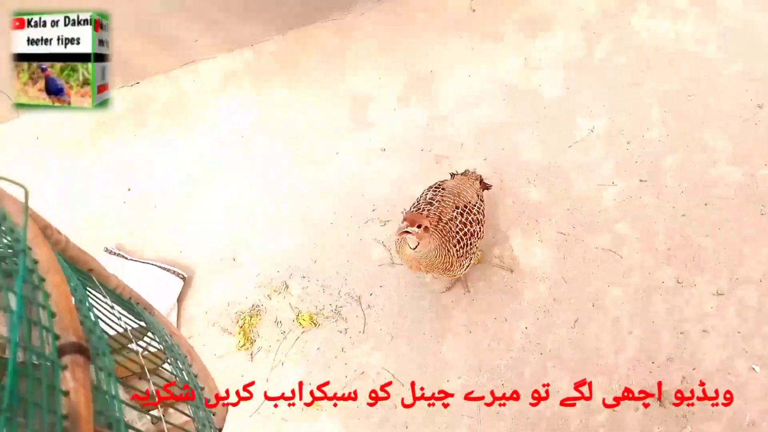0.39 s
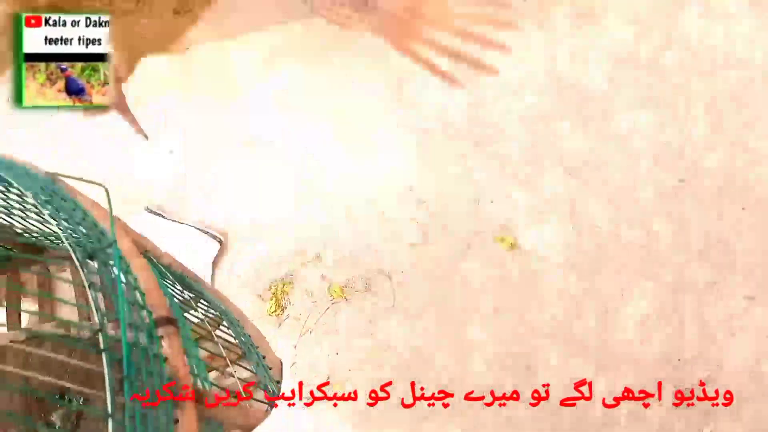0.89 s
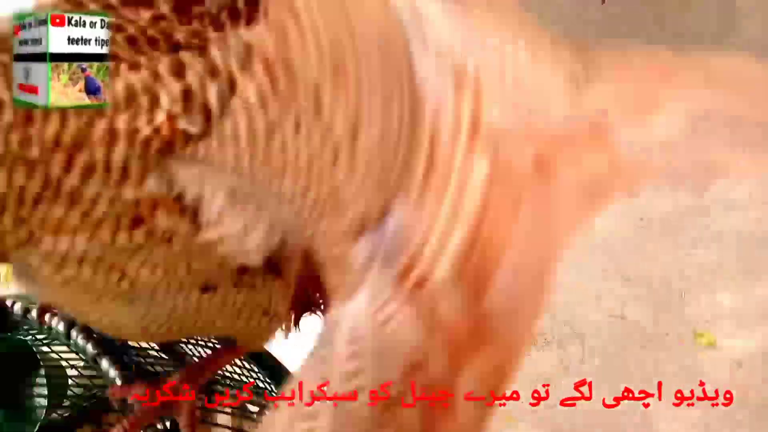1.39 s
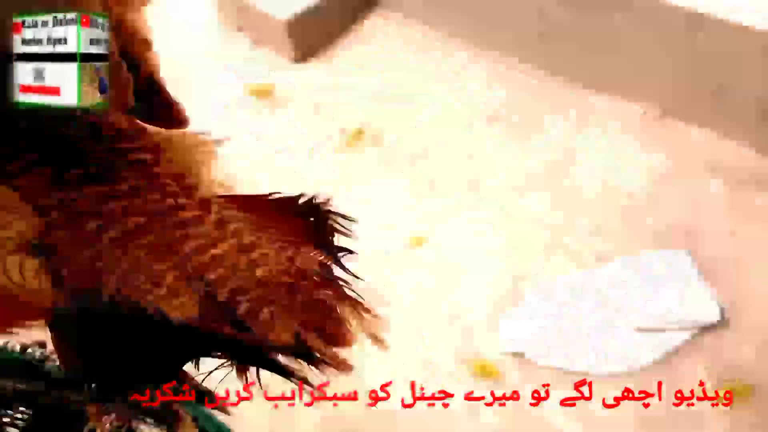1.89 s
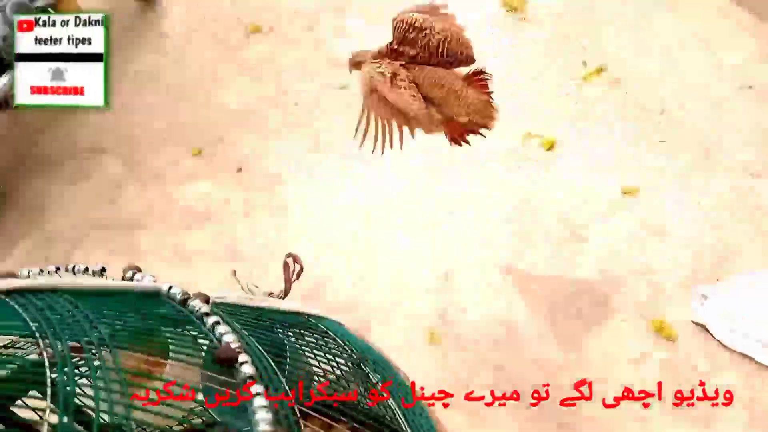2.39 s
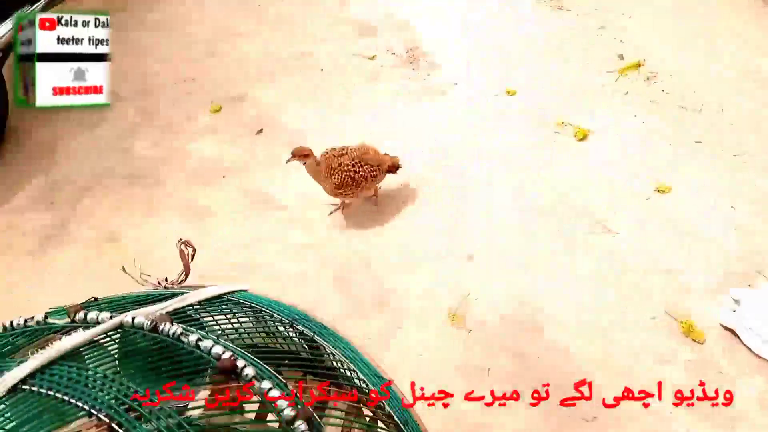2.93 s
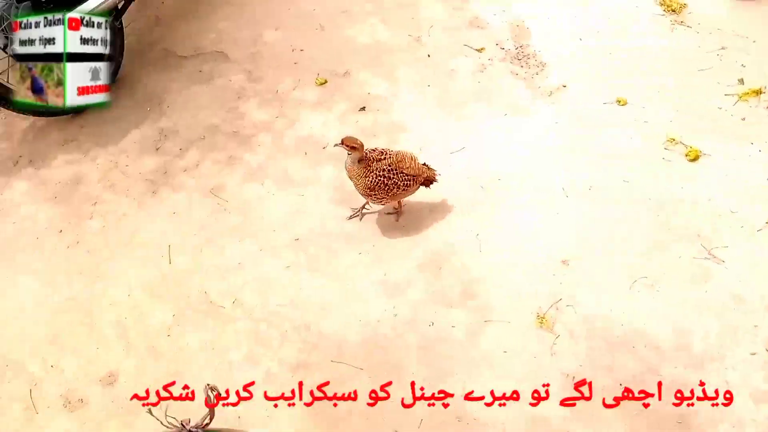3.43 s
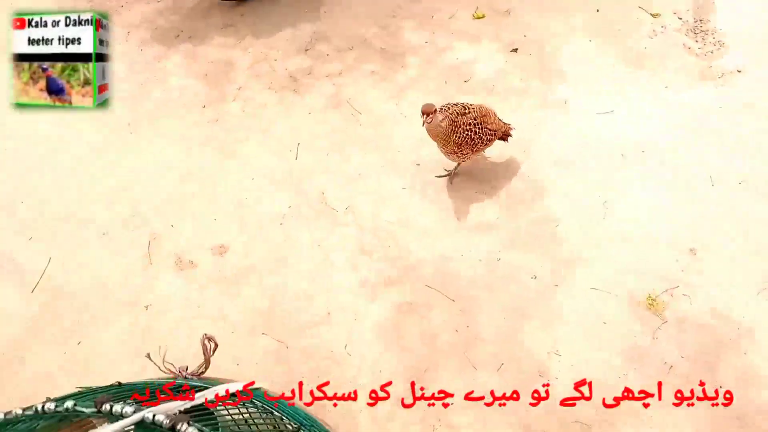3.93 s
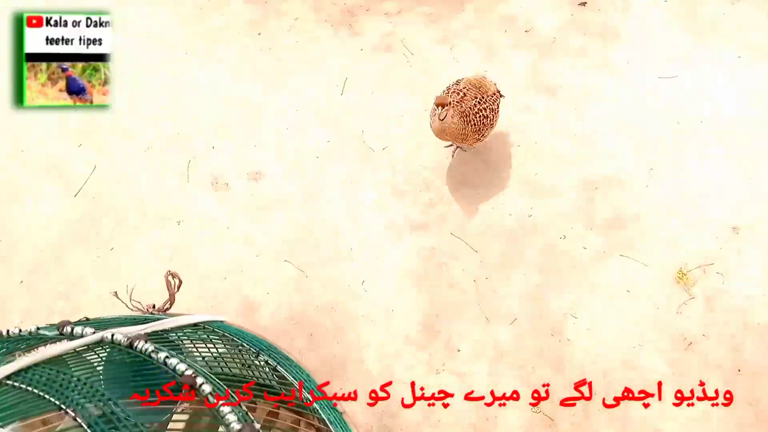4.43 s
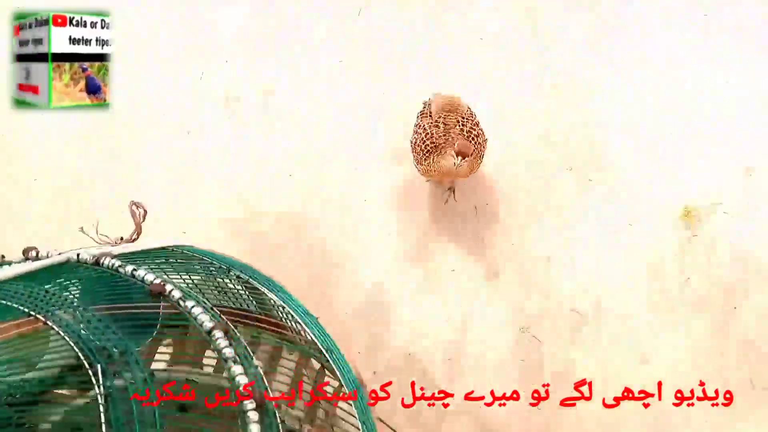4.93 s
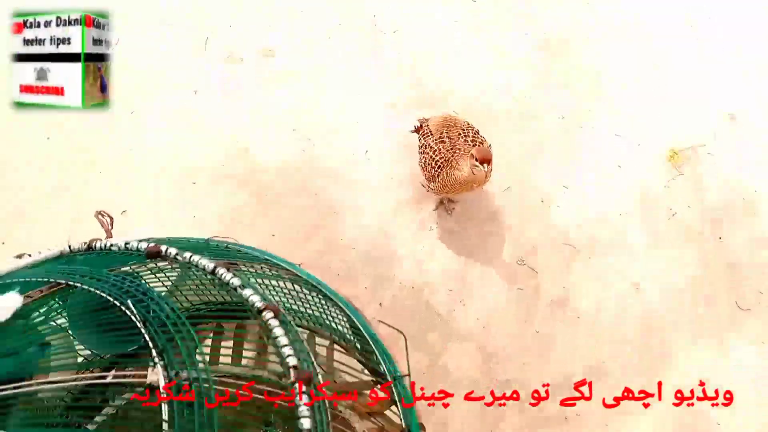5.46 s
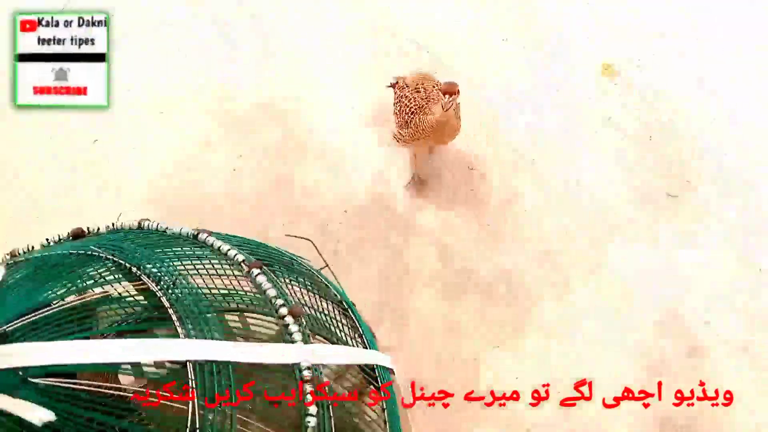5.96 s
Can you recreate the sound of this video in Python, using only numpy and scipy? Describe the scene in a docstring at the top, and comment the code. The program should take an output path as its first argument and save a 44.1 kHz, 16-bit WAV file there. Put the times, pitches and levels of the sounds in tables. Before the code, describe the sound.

A hard-floored yard with thin hiss, heard through a close, slightly resonant phone microphone. From 0.1 to 0.55 s a ground bird gives three hoarse, nasal calls, the third longest. At about 0.7 s short clucks begin and a bright startled squawk marks take-off. Between 0.8 and 2.4 s clucks continue at about five or six a second through dry cage knocks, crisp feather rustling and rumbling wing wash; the densest, loudest flurry is at 1.2-1.5 s, with low air thumps near 1.4 and 1.9 s. A sharp knock follows at 2.36 s, a weaker one at 2.57 s. Clucks thin out until 3.4 s, with another at 4.0 s. Small birds whistle and twitter faintly, clearest from 2.9 to 4.5 s; feet scuff softly at 3.8 and 4.8 s. After a quiet cluck, a long call rises from 5.05 s, peaks near 5.17 s and falls until 5.48 s; a cluck and short hoarse call end it.

```python
"""Clucking bird flies onto a cage

A ground bird clucks in quick runs on a hard yard floor, flies up onto a plastic cage by the microphone and drops back;
a long rising and falling call comes late. Its voice is a stack of harmonics shaped by the throat.
Claws and wings knock the cage as noise cracks and ringing modes, feathers rustle as clumped ticks, wing wash
rumbles on the port as low noise. Further off small birds whistle and twitter as wavering sines, over a thin
hiss of shaped noise, all heard through a phone microphone."""
import sys
import numpy as np
from scipy import signal
from scipy.fft import rfft, irfft
from scipy.io import wavfile
from scipy.ndimage import uniform_filter1d

SR = 44100
rng = np.random.default_rng(int(sys.argv[2]) if len(sys.argv) > 2 else 0)


def generate_wav(signal):
    """Clip the signal to [-1, 1] and save it as 16-bit WAV at the path in sys.argv[1]."""
    frames = np.transpose(np.atleast_2d(signal))
    scaled = np.clip(frames, -1, 1) * 32767
    pcm = np.round(scaled).astype(np.int16)
    wavfile.write(sys.argv[1], SR, pcm)


def attenuation_scalar(level_db):
    """Turn a level in dB into a linear amplitude multiplier (20 dB per decade)."""
    decades = np.asarray(level_db, float) / 20
    return 10 ** decades


N = 268128


def rms_one(x):
    """Scale to unit rms."""
    return x / np.sqrt(np.mean(x ** 2) + 1e-20)


def in_time(rows):
    """Sample span and columns of a curve table, with a gain that fades 6 ms at both ends."""
    s, *columns = np.transpose(rows)
    at = np.arange(round(s[0] * SR), min(round(s[-1] * SR), N))
    fade = np.clip(np.minimum(at - at[0], at[-1] - at) / (.006 * SR), 0, 1)
    return at, fade, [np.interp(at / SR, s, c) for c in columns]


def at_hz(points, hz):
    """Read a spectrum on a log-frequency axis."""
    points_hz, points_db = np.transpose(points)
    return np.interp(np.log(hz), np.log(points_hz), points_db)


def drift(rate, size=N):
    """Slow random wander of spread 1: noise twice through a one-pole low-pass."""
    r = np.exp(-2 * np.pi * rate / SR)
    noise = rng.standard_normal(size + 9000)
    return rms_one(signal.lfilter([1], [1, -2 * r, r * r], noise)[9000:])


def band(x, low_hz, high_hz):
    """Butterworth band-pass."""
    return signal.sosfilt(signal.butter(2, [low_hz, high_hz], "band", fs=SR, output="sos"), x)


def coloured(source, spectrum, patchy_db):
    """Shape the spectrum above 120 Hz, then let each half octave flicker on its own."""
    hz = np.arange(N // 2 + 1) * SR / N + 1
    shaped = rfft(source) * attenuation_scalar(at_hz(spectrum, hz)) * (hz > 120)
    out, edges = 0, 120 * 2.0 ** np.arange(0, 8, .5)
    for low, high in zip(edges, edges[1:]):
        flicker = np.repeat(drift(300, size=N // 40 + 1), 40)[:N]   # stretched 40 times: 7.5 Hz
        out = out + attenuation_scalar(patchy_db * flicker) * irfft(shaped * ((hz >= low) & (hz < high)), N)
    return out


def bouts(rows, rise_db_per_s, fall_db_per_s):
    """Gain of overlapping bouts that swell up to their start, hold and die away."""
    t = np.arange(N) / SR
    gain = 0
    for s, hold, db in rows:
        before, after = np.maximum(s - t, 0), np.maximum(t - s - hold, 0)
        gain = gain + attenuation_scalar(db - rise_db_per_s * before - fall_db_per_s * after)
    return gain


def ring(clicks, hz, t60):
    """A damped resonator: a unit click sets a sine of height 1 ringing."""
    r, w = attenuation_scalar(-60 / (t60 * SR)), 2 * np.pi * hz / SR
    return signal.lfilter([0, np.sin(w)], [1, -2 * r * np.cos(w), r * r], clicks + 1e-18)


# Every second pulse weakens while the long call glides. Each row: time in seconds, share 0-1.
PULSE_HALVING = [(5.09, 0), (5.115, .7), (5.14, 0), (5.2, 0), (5.25, .7), (5.3, 0)]
# Resonance of the throat. Each row: frequency in Hz, relative gain in dB.
THROAT_GAIN = [(300, 16), (600, 11), (1100, 6), (1650, 2.5), (2200, -13), (2750, -13.5), (3350, -13),
               (4300, -13.5), (6500, -38), (9000, -49.5)]
# Hoarseness of the voice. Each row: time in seconds, share 0-1.
HOARSENESS = [(.14, .35), (.2, .15), (.23, .6), (.27, .15), (.3, .35), (.33, .12), (.42, .35), (.47, .15),
              (.54, .12), (.69, .3), (.74, .2), (.88, .2), (.92, .1), (1.07, .12), (1.08, .6), (1.6, .1),
              (1.815, .12), (1.83, .6), (2.0, .1), (3.1, .1), (3.13, .3), (3.38, .35), (3.42, .3),
              (4.0, .15), (5.0, .45), (5.1, .3), (5.14, .06), (5.2, .08), (5.25, .4), (5.3, .08), (5.5, .3),
              (5.55, .45)]
# How squarely the bird faces the microphone. Each row: time in seconds, tilt above 2.5 kHz in dB per octave,
# upper harmonics of a cluck in dB, odd harmonics in dB.
BILL_FACING = [(.3, -1.5, 4, 0.5), (.68, -11.5, 16.5, -0.5), (.71, -11.5, 10.5, 0.5), (.9, -0.5, 9.5, -3),
               (1.05, 8, 1, -1), (1.6, -1, -6.5, -4), (1.8, -22.5, -1.5, -3), (2.05, -6, 1, -5),
               (2.5, -6, -5.5, -4), (3.4, -2, -9, -5.5), (4.0, 6, -2.5, -4.5), (5.0, 1.5, 2, -3),
               (5.2, -17.5, 3.5, -3), (5.27, -3.5, 1.5, -15), (5.47, -11, 6, -3.5), (5.49, -0.5, 7, -2)]


def voice(rows):
    """Pulses of the syrinx as harmonics through the throat; hoarseness shakes their pitch and strength."""
    at, fade, (hz, level_db, bright_db) = in_time(rows)
    t = at / SR
    rough = np.interp(t, *np.transpose(HOARSENESS))
    halving = np.interp(t, *np.transpose(PULSE_HALVING))
    bill_s, tilt, _, odd = np.transpose(BILL_FACING)
    tilt_db, odd_db = np.interp(t, bill_s, tilt), np.interp(t, bill_s, odd)
    hz = uniform_filter1d(hz, size=250)   # the muscles round off every turn of pitch
    shaken_hz = hz * (1 + .04 * rough * drift(250, size=len(at)))
    phase = 2 * np.pi * np.cumsum(shaken_hz) / SR
    low, high, low_power, high_power = 0, 0, 1e-12, 1e-12
    for k in range(1, 19):
        octaves_up = np.maximum(np.log2(k * hz / 2500), 0)
        gain = attenuation_scalar(at_hz(THROAT_GAIN, k * hz) + tilt_db * octaves_up + odd_db * (k % 2))
        share = np.clip((k * hz - 1650) / 350, 0, 1)   # the open bill lifts the upper harmonics
        waver = attenuation_scalar((2.2 + 2.2 * share) * drift(18, size=len(at)))
        rasp = 1 + (.6 + .6 * share) * rough * drift(200, size=len(at))
        tone = gain * waver * rasp * np.sin(k * phase + 0.344 * k * k)
        low, high = low + (1 - share) * tone, high + share * tone
        low_power = low_power + ((1 - share) * gain) ** 2
        high_power = high_power + (share * gain) ** 2
    sound = low / np.sqrt(low_power) + attenuation_scalar(bright_db - 11.5) * high / np.sqrt(high_power)
    breath = band(band(sound * rng.standard_normal(len(at)), 510, 2900), 450, 4600)   # gated by each pulse
    sound += attenuation_scalar(3) * (.1 + rough) * breath
    out = np.zeros(N)
    out[at] = fade * attenuation_scalar(level_db) * sound * (1 + halving * np.sin(phase / 2))
    return band(out, 300, 12000)


def cluck(s, length, peak_db, head_hz, tail_hz):
    """A sharp onset settles on a loud bright head, slides down to a duller tail and sags in pitch as it dies
    away."""
    attack_s, head_s, slide_s, release_s = .012, .016, 0.017, 0.0095
    times = np.array([0, attack_s, attack_s + head_s, attack_s + head_s + slide_s])
    times = times * min(1, (length - release_s - .002) / times[-1])   # short clucks hurry
    times = s + np.append(times, [length - release_s, length])
    settling_hz = (head_hz + 3.0 * tail_hz) / 4.0
    hz = [head_hz * 1.6, head_hz * .97, head_hz * 1.01, settling_hz, tail_hz, tail_hz * 0.65]
    level_db = peak_db + np.array([-8, -2.5, 0, -4.5, -4.5, -6])
    open_db = np.interp(s, np.array(BILL_FACING)[:, 0], np.array(BILL_FACING)[:, 2])
    bright_db = open_db - 10.5 * np.array([0, 0, 0, 1, 1, 1])   # dull tail
    return voice(np.transpose([times, hz, level_db, bright_db]))


# Short clucks. Each row: start in seconds, length in seconds, level of the head in dB, head pitch in Hz,
# tail pitch in Hz.
CLUCK_RUNS = [(0.671, 0.0427, -40, 560, 439), (0.704, 0.098, -36, 560, 469.6),
              (0.865, 0.095, -34.5, 638.5, 466.5), (1.034, 0.049, -33.5, 598, 521),
              (1.066, 0.058, -42, 573, 503), (1.244, 0.0463, -36, 560, 519),
              (1.59, 0.086, -33.5, 558.6, 459), (1.778, 0.049, -34.5, 584, 519),
              (1.821, 0.047, -39.5, 524, 512), (2.039, 0.071, -33.5, 569, 406),
              (2.184, 0.078, -36, 530.4, 358), (2.341, 0.082, -36, 513.4, 460),
              (2.498, 0.055, -32, 556, 448), (2.779, 0.075, -33, 534, 396.5),
              (3.054, 0.091, -33, 554.6, 462.5), (3.37, 0.075, -37.5, 576.4, 501),
              (3.997, 0.053, -37.5, 560, 527), (4.96, 0.072, -42, 541, 489),
              (5.478, 0.062, -38.5, 560, 500)]


def clucks():
    """The quick runs of short clucks, each one a breath pulse with its own pitch slide."""
    return sum(cluck(*row) for row in CLUCK_RUNS)


# Three drawn-out calls, a hoarse one and the startled squawk at take-off, one curve per call.
# Each row: time in seconds, pitch in Hz, low harmonics in dB, bill opening in dB (11.5 is neutral).
DRAWN_CALLS = [
    [(.098, 646, -36.5, 0), (.12, 597, -41, 5.5), (.16, 573, -39.5, -3), (.21, 509, -40, 2),
     (.232, 618, -42, 4), (.25, 600, -54, 22)],
    [(.252, 641, -40, 8), (.266, 532, -41, 19), (.282, 502, -51.5, 23), (.302, 480, -48, 12),
     (.318, 480, -48, 19), (.335, 482.5, -44, 20.5), (.372, 448.4, -48.5, 16), (.385, 500, -44.5, 13.5),
     (.403, 518, -50, 23), (.414, 602, -33, 3.5)],
    [(.412, 632, -25.5, -3), (.432, 632, -44, 9), (.46, 554, -34, 1.5), (.535, 444, -39.5, -6),
     (.55, 475, -62, 9)],
    [(5.535, 592, -50, 0), (5.552, 649, -43.5, 7.5), (5.595, 610, -45, -2.5), (5.612, 513, -47, -1.5)],
    [(.722, 714, -76, 19), (.734, 794.5, -23, 15.5), (.742, 809, -33, 7.5), (.757, 732, -32, 13),
     (.765, 734, -41, 23.5), (.773, 674, -60, 21)],
]
# The long rising and falling call. Each row: time in seconds, pitch in Hz, low harmonics in dB,
# bill opening in dB (11.5 is neutral).
WAIL_CURVE = [(5.045, 341.6, -46.5, -8.5), (5.085, 409.5, -45.5, -1), (5.099, 475.5, -43, 9),
              (5.113, 512, -48, 7.5), (5.151, 708.6, -32.5, -2.5), (5.173, 724.7, -34.5, 2.5),
              (5.249, 488.5, -40, -8.5), (5.323, 411, -42, -9.5), (5.413, 377.6, -46, -18),
              (5.451, 340, -49, -29.5), (5.478, 311, -41.5, -22)]


def long_calls():
    """Sustained calls: the same voice gliding along drawn pitch and level curves."""
    return sum(voice(rows) for rows in DRAWN_CALLS + [WAIL_CURVE])


# Claws click and wings slap on the cage. Each row: time in seconds, level in dB before the mix of the bands,
# low ring of the cage relative to it in dB, contact time in seconds.
CAGE_KNOCKS = [(0.7814, -30, 7, 0.0028), (0.836, -27.5, -27, 0.00089), (0.8548, -29, -16, 0.0045),
               (1.0147, -30, -29, 0.00214), (1.215, -5, -19.5, 0.00055), (1.226, -31.5, -19, 0.002),
               (1.2888, -25.5, -20, 0.0013), (1.2932, -10, -11, 0.0018), (1.3254, -28, 5, 0.00337),
               (1.35, -14.5, -26, 0.0074), (1.382, -18, -28, 0.005), (1.4204, -18, -22, 0.0021),
               (1.4444, -12.5, -12, 0.0036), (1.457, -21.5, -23, 0.0018), (1.5387, -29.5, -14, 0.0013),
               (1.6667, -29, 0.5, 0.0026), (1.7693, -30, -22, 0.0015), (1.8546, -20, -13.5, 0.0006),
               (1.871, -16.5, -32, 0.0013), (2.0179, -47, 10.5, 0.0017), (2.322, -37, -17, 0.0088),
               (2.358, -15.5, 6.5, 0.0009), (2.36, -25.5, -5, 0.0045), (2.5653, -27, 6, 0.0034)]
# Modes of the cage. Each row: frequency in Hz, level in dB before a 10 dB cut, ring time T60 in seconds.
CAGE_MODES = [(358, -20, 0.015), (560, 5.5, 0.007), (845, -2, 0.0091)]
# Colour of feather and knock noise. Each row: frequency in Hz, relative level in dB.
FEATHER_COLOUR = [(150, 6), (400, 7), (1500, -7.5), (5000, 3), (9000, -9), (12000, -14.5), (16000, -39.5)]


def knocks():
    """A crack of noise as long as the contact, a faint rattle and ringing modes; soft blows are dull."""
    after_db, after_t60_s = -14.5, 0.11   # the cage rattles on after each blow
    t = np.arange(round(.12 * SR)) / SR
    crack, treble, clicks = np.zeros(N), np.zeros(N), np.zeros(N)
    for s, peak_db, body_db, contact_s in CAGE_KNOCKS:
        i, contact_s = round(s * SR), max(contact_s, 1e-4)
        u = t / contact_s
        rattle = attenuation_scalar(after_db - 60 * t / after_t60_s) * np.minimum(u, 1)
        shape = u * np.exp(1 - u ** 1.033) + rattle
        soft_db = min(0.41 * (peak_db + 15.0), 0)
        slow_db = -2.42 * np.log2(contact_s / .001)   # longer contact, less treble
        crack[i:i + len(t)] += attenuation_scalar(peak_db) * shape
        treble[i:i + len(t)] += attenuation_scalar(peak_db + soft_db + slow_db) * shape
        clicks[i] = attenuation_scalar(peak_db + body_db)
    noise = rms_one(coloured(rng.standard_normal(N), FEATHER_COLOUR, patchy_db=4.0))
    low, high = band(noise, 150, 4200), band(noise, 5400, 17000)
    out = attenuation_scalar(-9.0) * crack * low + attenuation_scalar(-7.0) * treble * high
    for hz, level_db, t60 in CAGE_MODES:
        uneven_db = 2 * rng.standard_normal(N)   # each blow strikes the modes differently
        out += ring(clicks * attenuation_scalar(level_db - 10 + uneven_db), hz, t60)
    return band(out, 150, 16500)


# Bouts of feathers brushing past. Each row: start in seconds, hold in seconds, level at 7.5-15.5 kHz in dB.
FEATHER_BOUTS = [(.85, 0.9, -60.5), (1.3, 0.17, -57), (1.5, 0.44, -63.5), (2.05, 0.16, -57),
                 (2.4, 0.071, -63), (2.62, 0.059, -62.5), (2.81, 0.018, -68.5), (3.01, 0.057, -77.5)]


def rustle():
    """Feather barbs catch and slip: clumped crisp ticks on a little noise."""
    struck = rng.random(N) < 450 * attenuation_scalar(4 * drift(15)) / SR   # about 450 ticks a second, in clumps
    sizes = attenuation_scalar(5 * np.minimum(rng.exponential(1, N), 3.5)) * struck
    ticks = signal.lfilter([1], [1, -.97], sizes) * rng.standard_normal(N)
    crisp = rms_one(band(band(ticks, 7760, 16000), 7760, 16000))
    sound = coloured(crisp + 0.42 * rng.standard_normal(N), FEATHER_COLOUR, patchy_db=4.5)
    gain = bouts(FEATHER_BOUTS, rise_db_per_s=153.5, fall_db_per_s=278)
    return gain * sound / np.std(band(sound, 7500, 15500))


# Air pushed at the port. Each row: time in seconds, level in dB, frequency in Hz.
AIR_PUSHES = [(0.786, -31, 117), (1.35, -11, 76), (1.42, -16, 75.8), (1.878, -20.5, 70),
              (3.044, -35.5, 82.4), (5.154, -38, 178), (5.543, -37.5, 160)]


def pushes():
    """A downstroke close by pushes air at the port: a slow wave that swells and soon dies away."""
    out, t = np.zeros(N), np.arange(N) / SR
    for s, peak_db, hz in AIR_PUSHES:
        cycles = (t - s) * hz
        late = cycles - .3
        swell = np.exp(-np.where(late < 0, 6 * late ** 2, 2.4 * late))
        out += attenuation_scalar(peak_db) * swell * np.sin(2 * np.pi * cycles)
    return out


# Gusts of wing wash and handling on the port. Each row: start in seconds, hold in seconds, level in dB.
WASH_GUSTS = [(.8, 0.017, -50), (1.25, 0.21, -34.5), (1.9, 0.0068, -40.5), (2.48, 0.089, -55.5),
              (3.08, 0.083, -50), (.9, 2.4, -65), (5.2, 0.46, -70)]


def wash():
    """Lumpy low noise where moving air strikes the port."""
    low = band(rng.standard_normal(N), 49.4, 156)
    lumps = band(low * attenuation_scalar(4.0 * drift(6)), 38, 400)
    still_air = attenuation_scalar(-75)
    return (still_air + bouts(WASH_GUSTS, rise_db_per_s=209, fall_db_per_s=152)) * rms_one(lumps)


# Feet scuffing the floor. Each row: start in seconds, length in seconds, level in dB before a 6.5 dB cut.
FLOOR_SCUFFS = [(3.762, 0.058, -52.5), (4.762, 0.098, -53), (4.857, 0.026, -56.5), (5.691, 0.05, -55)]


def scuffs():
    """Feet scrape the floor: short gritty strokes of noise."""
    t = np.arange(N) / SR
    stroke = sum(attenuation_scalar(db) * np.sin(np.pi * np.clip((t - s) / length, 0, 1)) for s, length, db in FLOOR_SCUFFS)
    noise = rms_one(band(band(rng.standard_normal(N), 1000, 3700), 900, 5000))
    grit = attenuation_scalar(3.2 * drift(80))
    return attenuation_scalar(-6.5) * stroke * grit * noise


def whistle(rows, under_db=-60):
    """A near sine that wavers in pitch and level; under_db sets the octave below."""
    at, fade, (hz, level_db) = in_time(rows)
    phase = 2 * np.pi * np.cumsum(hz * (1 + .012 * drift(120, size=len(at)))) / SR
    gain = np.sqrt(2) * fade * attenuation_scalar(level_db + 4 * drift(90, size=len(at)))
    out = np.zeros(N)
    out[at] = gain * (np.sin(phase) + attenuation_scalar(under_db) * np.sin(phase / 2))
    return out


# Arched whistles of small birds. Each row: start in seconds, length in seconds, top pitch in Hz, level in dB,
# octave below in dB.
ARCHED_WHISTLES = [(0.614, 0.062, 3104, -49.5, -4), (3.474, 0.104, 3020, -68.5, -31),
                   (3.661, 0.14, 2980, -69.5, -32), (3.873, 0.13, 3180, -68.5, -41)]


def arched_whistles():
    """Small birds sweep a whistle up to a top and down again, softer at both ends."""
    out = 0
    for s, length, hz, db, under_db in ARCHED_WHISTLES:
        top_s = length * 0.382
        out = out + whistle([(s, hz * 0.95, db - 2), (s + top_s / 2, hz * .97, db), (s + top_s, hz, db),
                             (s + length * 0.62, hz * .96, db + 2), (s + length, hz * .84, db - 2)], under_db)
    return out


# Straight whistles, falling chirps and a faint low coo of other birds. Each row: start in seconds,
# length in seconds, first pitch in Hz, pitch aimed at in Hz, level in dB.
SLIDING_WHISTLES = [(0.144, 0.12, 6400, 1890, -60), (0.571, 0.027, 2390, 2150, -58.5),
                    (2.723, 0.43, 313.4, 355, -68.5), (3.196, 0.45, 350, 306, -70.5),
                    (0.61, 0.21, 3500, 3420, -57.5), (0.638, 0.036, 4570, 3760, -49),
                    (1.061, 0.031, 5300, 3240, -58), (1.08, 0.17, 2230, 2046, -59),
                    (1.141, 0.12, 3673, 2150, -52.5), (2.13, 0.052, 1860, 1680, -55.5),
                    (2.913, 0.032, 3730, 2780, -66), (3.277, 0.036, 3250, 3740, -60),
                    (3.47, 0.12, 6460, 6640, -71), (3.948, 0.046, 4080, 3180, -64),
                    (4.096, 0.069, 4920, 4300, -62), (4.3, 0.22, 2150, 2150, -71.5),
                    (4.321, 0.075, 4370, 3720, -62), (4.38, 0.053, 4300, 3620, -62),
                    (4.751, 0.066, 3250, 3134, -63)]


def sliding_whistles():
    """Other birds slide straight from one pitch past another, growing slightly louder."""
    out = 0
    for s, length, from_hz, aim_hz, db in SLIDING_WHISTLES:
        end_hz = from_hz + 1.3 / 1.1 * (aim_hz - from_hz)   # overshoots the aim by 18 % of the way
        out = out + whistle([(s, from_hz, db - 2), (s + length, end_hz, db - 2 + 2 / 1.1)])
    return out


# Middles of the twitter bouts, in seconds.
TWITTER_TIMES = (2.92, 3.24, 3.3, 3.36, 3.9, 4.17, 4.4, 4.42)


def twitter():
    """Far sparrows: bouts of short arched chirps, blurred by distance."""
    out = np.zeros(N)
    for k, (when, top, fall, long, loud) in enumerate(rng.random((96, 5))):
        s = TWITTER_TIMES[k % len(TWITTER_TIMES)] + .2 * (when - .5)
        hz, length = 2800 + 2100 * top, .02 + .03 * long
        peak_db = -77 + 12 * loud - 6
        end_hz = hz * (.9 - .2 * fall)
        out += whistle([(s, hz * .94, peak_db - 8), (s + length / 3, hz, peak_db),
                        (s + length, end_hz, peak_db - 8)])
    return out + .6 * np.roll(out, 400) + .45 * np.roll(out, 1100)   # repeats 9 and 25 ms late


# Outdoor hiss, swelling while the bird beats about. Each row: time in seconds,
# level at 1.2-4.8 kHz in dB before a 12 dB cut.
YARD_LEVEL = [(0, -58.5), (.58, -49.5), (1.15, -49), (1.25, -36), (1.48, -39.5), (1.6, -51), (1.97, -55.5),
              (6.08, -55.5)]
# Colour of the hiss. Each row: frequency in Hz, relative level in dB.
HISS_COLOUR = [(140, -9.5), (320, -6), (600, -11), (870, -5), (1150, -14), (2000, -6.5), (4500, -12),
               (5300, -22.5), (6400, -19.5), (7000, -35), (11000, -34.5), (14500, -52.5), (16000, -68)]


def yard():
    """Outdoor hiss from all around: noise with a fixed colour and a slow level curve."""
    at, _, (level_db,) = in_time(YARD_LEVEL)
    sound = coloured(rng.standard_normal(N), HISS_COLOUR, patchy_db=2.6)
    gain = np.interp(np.arange(N), at, attenuation_scalar(level_db - 12.0))
    return gain * sound / np.std(band(sound, 1200, 4800))


# Reflections from floor and wall. Each row: delay in seconds, level in dB.
FLOOR_AND_WALL = [(.004, -28), (.016, -15.5)]


def with_echoes(near):
    """Floor and wall send back two late copies with dulled treble."""
    dull = band(near, 300, 2800)
    for delay_s, level_db in FLOOR_AND_WALL:
        lag = round(delay_s * SR)
        near[lag:] += attenuation_scalar(level_db) * dull[:-lag]
    return near


def scene():
    """All sources; calls, whistles, knocks and scuffs come with two dull echoes."""
    near = clucks() + long_calls() + knocks() + scuffs() + arched_whistles() + sliding_whistles()
    return (with_echoes(near) + rustle() + pushes() + wash() + twitter() + yard())[None]


def top_cut(x):
    """Nothing passes above the cut-off."""
    return signal.sosfilt(signal.butter(12, 16820, fs=SR, output="sos"), x)


# Peaks and dips of the microphone duct. Each row: frequency in Hz, width in Hz, gain in dB.
DUCT = [(2150, 1270, 15), (4220, 1090, 8.5), (5260, 790, -8), (6104, 310, 12), (8180, 3300, -8.5),
        (8260, 250, 15.5), (14840, 3260, 27.5)]


def record(dry):
    """The sound duct of a phone microphone resonates near multiples of 2 kHz: a chain of peaking filters."""
    for hz, width_hz, peak_db in DUCT:
        a, w = attenuation_scalar(peak_db / 2), 2 * np.pi * hz / SR
        q = np.sin(w) * width_hz / hz / 2
        middle = -2 * np.cos(w)
        dry = signal.lfilter([1 + q * a, middle, 1 - q * a], [1 + q / a, middle, 1 - q / a], dry)
    return top_cut(dry)


dry = scene()
out = record(dry)
generate_wav(out)
```